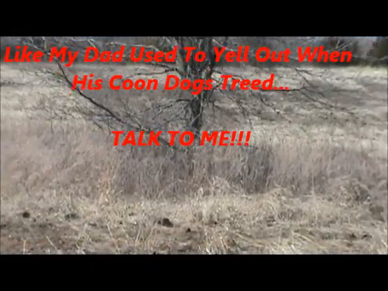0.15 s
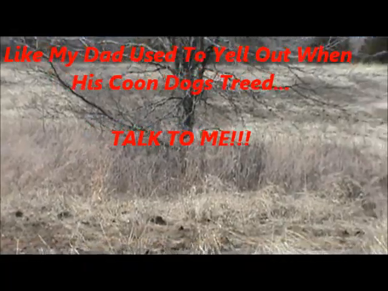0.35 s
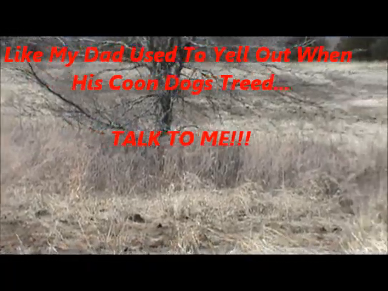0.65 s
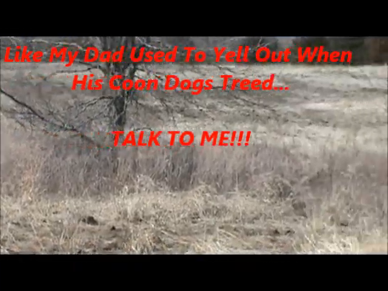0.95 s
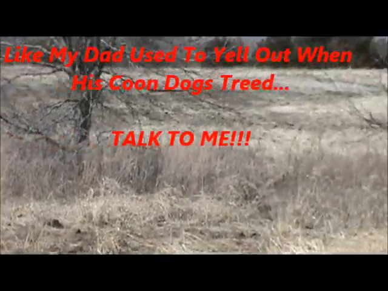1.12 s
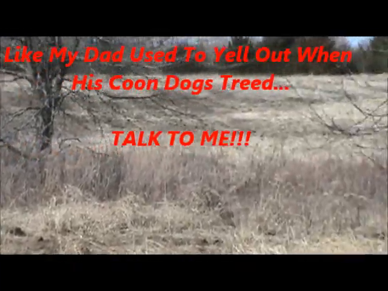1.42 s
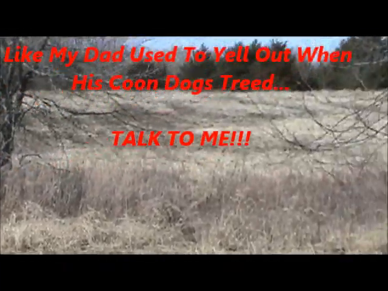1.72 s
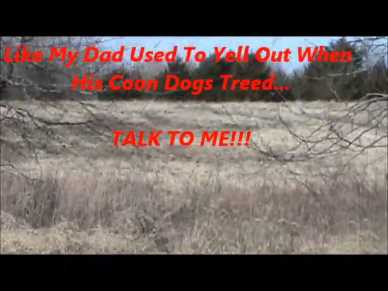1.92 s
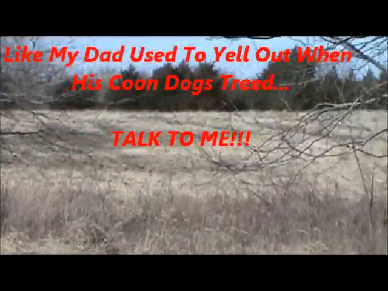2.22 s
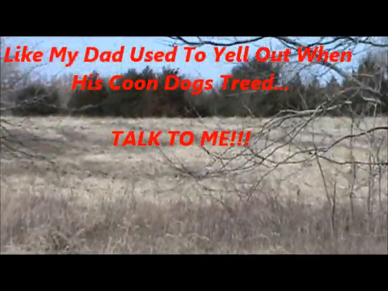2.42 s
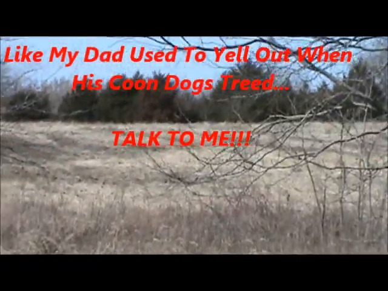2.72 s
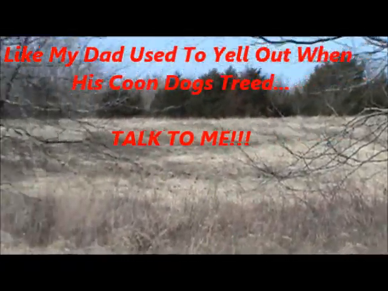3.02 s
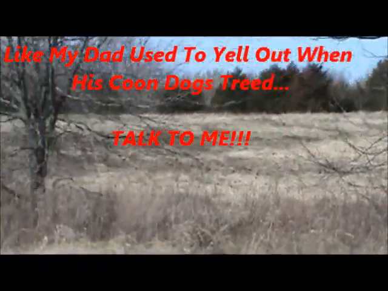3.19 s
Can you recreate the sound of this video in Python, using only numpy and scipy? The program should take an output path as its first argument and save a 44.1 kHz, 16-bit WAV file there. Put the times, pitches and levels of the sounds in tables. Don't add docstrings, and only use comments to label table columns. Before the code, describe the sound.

Two dogs bawl and yelp on a trail, echoing off scrub, with wind thumps and rustling grass.

```python
import sys
import numpy as np
from scipy import signal
from scipy.fft import rfft, irfft
from scipy.io import wavfile

SR = 44100
rng = np.random.default_rng(int(sys.argv[2]) if len(sys.argv) > 2 else 0)


def dump(signal):
    limited = np.clip(np.atleast_2d(signal).T, -1, 1)
    pcm = np.round(limited * 32767).astype(np.int16)
    wavfile.write(sys.argv[1], SR, pcm)


def to_linear_factor(level_db):
    exponent = np.asarray(level_db, float) / 20
    return 10 ** exponent


N = 147735


def in_time(rows):
    return np.interp(np.arange(N) / SR, *np.transpose(rows))


def rms_one(x):
    return x / np.sqrt(np.mean(x ** 2) + 1e-20)


def drift(rate, count=1):
    r = np.exp(-2 * np.pi * rate / SR)
    noise = rng.standard_normal((count, N + 8000))
    return rms_one(signal.lfilter([1], [1, -2 * r, r * r], noise)[:, 8000:])


def colour(x, points, steep_db=40):
    hz, db = np.transpose(points)
    f = np.log(np.maximum(np.arange(N // 2 + 1) * SR / N, 1))
    outside = np.maximum(np.log(hz[0]) - f, 0) + np.maximum(f - np.log(hz[-1]), 0)
    return irfft(rfft(x) * to_linear_factor(np.interp(f, np.log(hz), db) - steep_db * outside), N)


def swell(t, length, attack, release):
    ramp = np.minimum(t / attack, (length + release / 2 - t) / release)
    return np.sin(np.pi / 2 * np.clip(ramp, 0, 1)) ** 2


def bumps(rows):
    t = np.arange(N) / SR
    return sum(to_linear_factor(db) * np.exp(-((t - s) / width) ** 2) for s, width, db in rows)


def voice(notes, overtones_db, jitter, shimmer_db, attack, release, half_db=-90, grow=0):
    # t/s, f/Hz
    mouth_path = [(.6, 1960), (.85, 2820), (1.3, 2310), (1.72, 2330), (1.8, 2280), (2.1, 2160),
                  (2.18, 1200), (2.3, 1480), (2.45, 2380), (2.68, 2300), (2.76, 1220), (3.0, 1380),
                  (3.15, 1730), (3.3, 1200)]
    mouth_db, mouth_width_hz = 5.5, 287
    dip_hz, dip_width_hz, dip_db = 3640, 373, -19
    half_rise_db = 9
    slur_s = .008

    out, turns = np.zeros(N), np.zeros(N)
    waver, mouth_hz = drift(79)[0], in_time(mouth_path)
    flicker = drift(69, count=len(overtones_db))
    ended, last_db = -1, -90
    for s, length, start_hz, end_hz, db in notes:
        slurred = abs(s - ended) < slur_s
        s, ended = (ended - release / 2 if slurred else s), s + length
        length = ended - s
        i = np.arange(max(int(s * SR), 0), min(int((ended + release) * SR), N))
        t = i / SR - s
        hz = (start_hz + (end_hz - start_hz) * t / length) * (1 + jitter * waver[i])
        turn = turns[i] = turns[i[0]] + 2 * np.pi * np.cumsum(hz) / SR

        stack = 0
        for k, overtone_db in enumerate(overtones_db):
            partial_hz = (k + 1) * hz
            throat_db = dip_db * np.exp(-((partial_hz - dip_hz) / dip_width_hz) ** 2)
            jaw_db = mouth_db * np.exp(-((partial_hz - mouth_hz[i]) / mouth_width_hz) ** 2)
            unsteady_db = shimmer_db * (1 + k) ** .5 * flicker[k, i]
            partial = to_linear_factor(overtone_db + throat_db + jaw_db + unsteady_db) * np.sin((k + 1) * turn + k * k)
            stack += partial * (1 + to_linear_factor(min(half_db + half_rise_db * k, 0)) * np.sin(turn / 2))

        effort = swell(t, length, release if slurred else attack, release)
        first, last_db = np.clip(to_linear_factor(last_db - db) * slurred, .3, 1.8), db
        effort = effort * (first + (1 - first) * np.clip(t / (grow * length + 1e-6), 0, 1))
        out[i] += np.sqrt(2) * to_linear_factor(db) * effort * stack
    return out


def chest_register():
    # t/s, length/s, start f/Hz, end f/Hz, level/dB
    clear = [(.036, 0.019, 872, 814, -17.5), (.408, 0.02, 708, 733, -14.5), (.908, .036, 669, 795, -11),
             (1.046, 0.0087, 896, 687, -27), (1.088, 0.013, 720, 620, -24), (1.244, 0.024, 959, 848, -17),
             (1.266, 0.048, 712.3, 735.4, -6.5), (1.372, 0.028, 889.6, 831, -9),
             (1.403, 0.014, 789, 772, -14.5), (1.424, 0.01, 747, 637, -14), (1.681, 0.018, 1003, 905, -21),
             (1.697, 0.059, 729.4, 753.4, -8), (1.836, 0.01, 780, 682, -13.5),
             (2.228, 0.053, 762, 783.5, -9.5), (2.357, 0.018, 746, 776, -15),
             (2.612, 0.038, 758, 697, -13.5), (2.862, 0.019, 876, 894, -19),
             (2.881, 0.079, 717.3, 731, -9.5), (2.951, 0.068, 734, 733.4, -11.5),
             (3.011, 0.054, 737, 740, -13), (3.071, 0.081, 760, 702, -21), (3.073, 0.051, 587, 667, -13.5)]
    # t/s, length/s, start f/Hz, end f/Hz, level/dB
    hoarse = [
        (1.955, 0.14, 799, 761, -25.5),
        (2.281, 0.07, 689, 679, -16),
        (2.652, 0.063, 705, 690, -19),
        (2.72, .04, 700, 678, -29.5),
    ]
    partials_db = [2, -23.5, -26, -25.5, -54.5]
    return (voice(clear, partials_db, 0.011, 1.3, 0.0063, 0.0055, grow=0.56)
            + voice(hoarse, partials_db, 0.022, 3.5, 0.0042, 0.011))


def head_register():
    # t/s, length/s, start f/Hz, end f/Hz, level/dB
    clear = [
        (-.01, 0.052, 949, 941, -22.5),
        (.04, 0.032, 975, 926, -29.5),
        (.43, 0.089, 916, 943.4, -23.5),
        (.944, 0.1015, 875, 927.4, -20),
        (1.311, 0.084, 878.8, 862, -18.5),
    ]
    # t/s, length/s, start f/Hz, end f/Hz, level/dB
    cracked = [
        (1.75, 0.038, 900, 885, -22),
        (1.785, 0.047, 880, 868, -21),
        (3.075, 0.046, 870, 850, -26),
        (3.115, 0.0945, 875, 863, -26),
        (3.209, 0.052, 852, 850, -27.5),
        (3.26, 0.092, 850, 880, -26),
    ]
    clear_db = [0.5, -10, -16.5, -42, -30]
    cracked_db = [1.5, -7, -9.5, -40]
    return (voice(clear, clear_db, .006, 1.3, 0.0016, 0.01)
            + voice(cracked, cracked_db, .013, 2.6, 0.006, .012, grow=0.28))


def squeaks():
    # t/s, length/s, start f/Hz, end f/Hz, level/dB
    yelps = [(.06, 0.026, 1530, 1330, -25.5), (.375, 0.069, 1620, 1350, -24.5),
             (.443, 0.052, 1500, 1460, -28), (.525, 0.024, 1610, 1560, -28),
             (.565, 0.029, 1570, 1580, -31.5), (.597, 0.045, 1590, 1430, -43),
             (.075, 0.028, 1730, 1530, -33.5), (.52, 0.047, 1900, 1885, -29),
             (.572, 0.154, 1890, 1880, -41.5), (1.05, 0.11, 1880, 1870, -37.5),
             (1.715, 0.042, 2180, 2260, -28), (1.69, 0.014, 1750, 1700, -23.5),
             (2.215, 0.043, 2640, 2620, -31), (.985, 0.076, 1406, 1430, -32), (1.2, .06, 1400, 1420, -33.5),
             (.87, 0.0153, 1200, 1360, -29), (.885, 0.082, 1380, 1398, -23),
             (2.378, 0.042, 1200, 1180, -15.5), (2.413, 0.036, 1250, 1250, -10.5),
             (2.443, 0.029, 1267, 1250, -16.5)]
    partials_db = [-3.5, -17.5, -26.5, -52, -52, -38, -38]
    return voice(yelps, partials_db, 0.0123, 1.5, 0.0048, 0.0095)


def second_hound():
    # t/s, length/s, start f/Hz, end f/Hz, level/dB
    bawls = [
        (1.975, 0.04, 634.8, 689, -15),
        (2.008, 0.051, 629, 602.6, -6.5),
        (2.068, 0.14, 566.9, 587, -11.5),
        (2.209, 0.15, 584.8, 545.7, -12),
        (2.93, 0.1173, 560, 577, -13),
        (3.048, .1, 572, 558.5, -16.5),
        (3.148, 0.058, 557, 548, -21),
    ]
    # t/s, length/s, start f/Hz, end f/Hz, level/dB
    open_bawls = [
        (2.69, 0.029, 617, 598, -24.5),
        (2.72, 0.089, 608, 586.4, -27),
        (3.19, 0.073, 545, 536, -33),
        (3.255, 0.096, 545, 537, -24.5),
    ]
    bawl_db = [-5, -20, -23, -32, -28, -42]
    open_db = [-7, -2, -15, -6, -9.5, -33]
    return (voice(bawls, bawl_db, 0.0075, 1.0, 0.0016, 0.0063, half_db=-20.5)
            + voice(open_bawls, open_db, 0.0069, 1.7, 0.012, 0.026))


def rasp():
    # t/s, length/s, level/dB, extra brightness/dB
    breaths = [(0.017, 0.074, -36.5, 0), (0.408, 0.18, -41.5, 4), (0.914, 0.21, -35.5, 3),
               (1.234, 0.223, -31.5, 4), (1.672, 0.19, -26, 5), (1.85, 0.13, -34, -21),
               (1.959, 0.099, -21, -14), (2.036, 0.089, -20.5, 0.5), (2.116, 0.12, -28, -4),
               (2.272, 0.15, -22, -1.5), (2.626, 0.12, -21, 2), (2.891, 0.32, -25.5, 2.5),
               (3.176, 0.33, -32, 5)]
    # f/Hz, level/dB per Hz
    throat = [(240, -31.5), (400, -25), (633, -7.5), (958, -15.5), (1250, -13), (2520, -20.5),
              (3600, -37.5), (4680, -43.5), (7920, -120)]
    slip_hz, bright_hz = 303, 2060
    patch_db, patch_per_s, patch_width_hz = 2.5, 30, 300

    t = np.arange(N) / SR
    wander_db = 1.2 * drift(4.6)[0] + .5 * drift(50)[0]
    cycles = np.cumsum(slip_hz * to_linear_factor(wander_db)) / SR
    clicks = np.diff(np.floor(cycles), prepend=0) * to_linear_factor(2 * rng.standard_normal(N))
    puffs = rng.standard_normal(N) * np.exp(0.5 * np.cos(2 * np.pi * cycles))
    air = rms_one(puffs) + 2.2 * rms_one(clicks)
    air = air * to_linear_factor(1.5 * drift(65)[0])

    lows = np.arange(200, 4500, patch_width_hz)
    patchy = 0
    for low, patch in zip(lows, drift(patch_per_s, count=len(lows))):
        band = signal.butter(2, [low, low + patch_width_hz], "band", fs=SR, output="sos")
        patchy += to_linear_factor(patch_db * patch) * signal.sosfilt(band, air)

    voiced = rms_one(colour(patchy, throat))
    dull = signal.sosfiltfilt(signal.butter(2, bright_hz, fs=SR, output="sos"), voiced)
    bright = voiced - dull
    return sum(to_linear_factor(db) * swell(t - s, length, 0.032, 0.049) * (dull + to_linear_factor(bright_db) * bright)
               for s, length, db, bright_db in breaths)


def hounds():
    return chest_register() + head_register() + squeaks() + second_hound() + rasp()


def brush_echo(x):
    t60_s, scatter = .9, .08
    echo_db, side_db = -8, -5.5
    t = np.arange(SR // 2) / SR
    returns = rng.standard_normal((2, len(t))) * (rng.random(len(t)) < scatter)
    taps = returns * to_linear_factor(-60 * t / t60_s) * (t > .012)
    thin = signal.lfilter([1, -.93], [1, -.6], x)
    mid, side = signal.fftconvolve(thin[None], taps / np.sqrt(np.sum(taps[0] ** 2)), axes=1)[:, :N]
    return to_linear_factor(echo_db) * (mid + to_linear_factor(side_db) * side * np.array([[1], [-1]]))


def grass():
    # f/Hz, level/dB per Hz
    hiss = [(180, -27), (300, -2), (852, -9), (1130, -7.5), (5460, -18.5), (10100, -12.5), (15800, -22.5)]
    # middle t/s, spread/s, level/dB
    strides = [(.5, 0.21, -47), (1.36, 0.15, -33.5), (1.85, 0.29, -42.5), (2.25, 0.2, -41),
               (2.75, 0.15, -31.5), (2.93, 0.061, -38), (.04, 0.021, -45), (1.1, .08, -43.5),
               (2.05, 0.038, -55), (3.05, 0.062, -45.5), (3.3, .1, -49)]
    # f/Hz, level/dB per Hz
    swish_tone = [(1940, -15.5), (3300, -10), (6100, -13), (9840, -12), (15800, -24.5)]
    # t/s, peak level/dB, f/Hz
    snaps = [(0.9577, -11, 9800), (1.195, -20, 6960), (1.337, -21, 7300), (1.592, -20.5, 8500),
             (1.602, -16.5, 10200), (2.796, -23, 8640), (.1291, -34, 10200), (1.099, -28, 4000),
             (1.1293, -27, 10600), (1.1617, -27, 11100), (1.178, -40, 4500), (1.8277, -21, 10900),
             (1.8761, -22, 10800), (2.0038, -26.5, 8620), (2.048, -28, 8500), (2.2144, -23, 10500),
             (2.564, -26, 10500)]

    sides = np.array([[1], [-1]])
    white = rng.standard_normal((4, N))
    far = rms_one(colour(white[0] + .5 * white[1] * sides, hiss))
    bed = to_linear_factor(-40.5 + 1.2 * drift(8.7)[0]) * far

    hits = rng.random(N) < 1500 * to_linear_factor(5.0 * drift(30)[0]) / SR
    strengths = to_linear_factor(2.35 * np.minimum(rng.exponential(1, N), 5))
    grains = hits * strengths * rng.choice([-1, 1], N)
    mid = white[2] + 7.4 * grains
    swish = rms_one(colour(mid + .5 * mid.std() * white[3] * sides, swish_tone, steep_db=8))
    bed += bumps(strides) * swish * to_linear_factor(-.8 * sides)

    t = np.arange(600) / SR
    cracks = rng.standard_normal((len(snaps), 600)) * to_linear_factor(-60 * t / 0.026)
    for (s, db, hz), crack in zip(snaps, cracks):
        band = signal.butter(2, [hz * 0.6, min(hz * 1.66, 15500)], "band", fs=SR, output="sos")
        crack = signal.sosfilt(band, crack)
        i = int(s * SR)
        bed[:, i:i + 600] += (to_linear_factor(db - 1.5) * crack / np.abs(crack).max())[:N - i]
    return bed


def wind():
    # middle t/s, spread/s, level/dB
    gusts = [(.08, 0.019, -16.5), (.2, 0.056, -27), (.44, 0.043, -22.5), (.54, 0.036, -12.5),
             (.71, 0.034, -20), (.88, 0.073, -31.5), (.98, 0.037, -24.5), (2.05, 0.031, -31.5),
             (2.8, 0.048, -33), (3.2, 0.03, -35), (3.31, 0.045, -22.5), (.31, 0.039, -30), (.8, .03, -34),
             (1.5, .06, -42)]
    # f/Hz, level/dB per Hz
    rumble = [(29, -8.5), (48, -9.5), (80, -4), (119, -5), (236, -16), (450, -31), (580, -38.5),
              (990, -120)]
    breeze_db = -40
    lumps = (to_linear_factor(breeze_db) + bumps(gusts)) * to_linear_factor(2.34 * drift(28)[0])
    white = rng.standard_normal((3, N))
    turned = signal.hilbert(white[0])
    shared = np.array([(turned * np.exp(.7j)).real, (turned * np.exp(-.7j)).real])
    ports = shared + 0.86 * white[1:]
    return colour(lumps * ports, rumble, steep_db=5) / colour(ports, rumble).std()


def whine():
    return np.sqrt(2) * to_linear_factor(-63) * np.sin(2 * np.pi * 15734 * np.arange(N) / SR)


def scene():
    # t/s, left over right level/dB
    bearing = [
        (0, 1.5),
        (1.2, 1.7),
        (2.6, 1.96),
    ]
    dogs, left_db = hounds(), in_time(bearing) / 2
    return dogs * to_linear_factor([left_db, -left_db]) + brush_echo(dogs) + grass() + wind() + whine()


def top_cut(x):
    return signal.sosfilt(signal.butter(12, 15910, fs=SR, output="sos"), x)


def record(dry):
    mix = 1.122 * np.tanh(dry / 1.106)
    return top_cut(mix)


dry = scene()
out = record(dry)
dump(out)
```